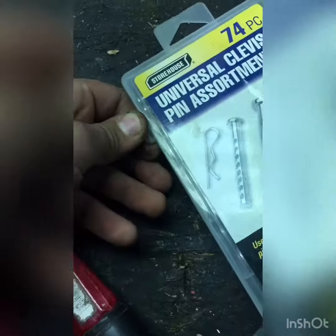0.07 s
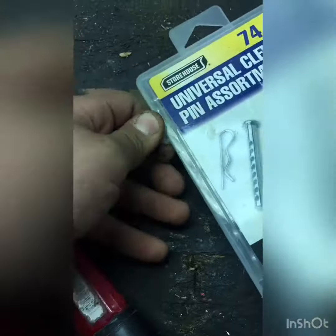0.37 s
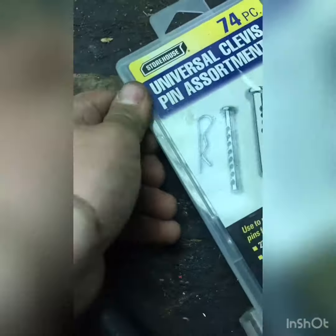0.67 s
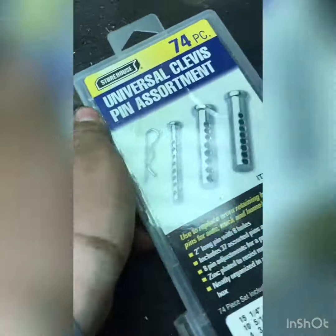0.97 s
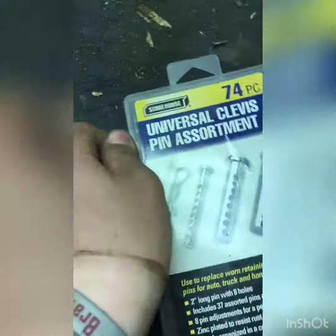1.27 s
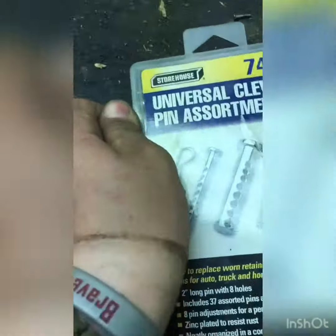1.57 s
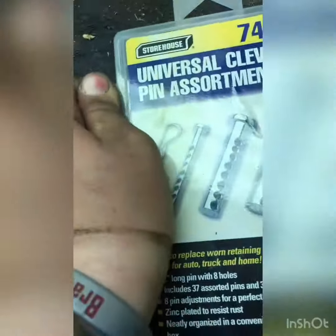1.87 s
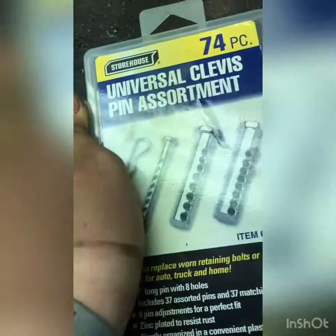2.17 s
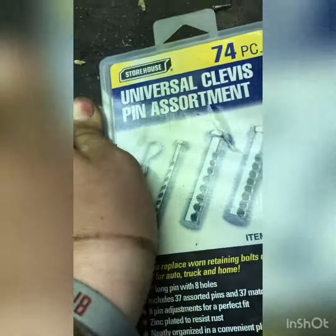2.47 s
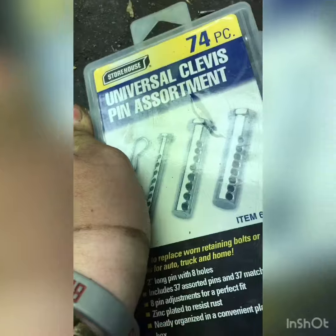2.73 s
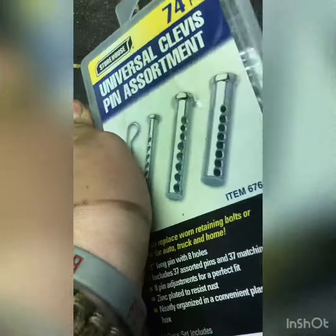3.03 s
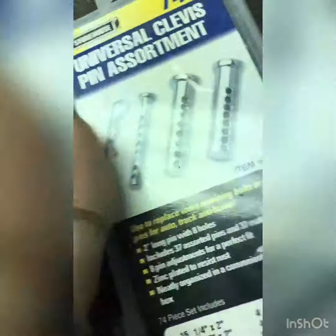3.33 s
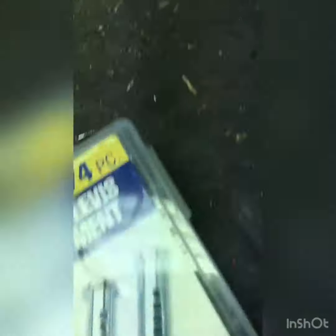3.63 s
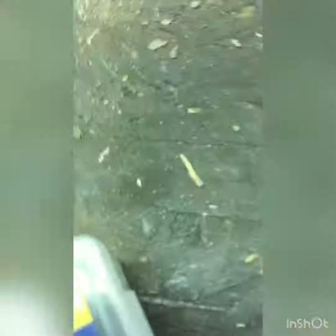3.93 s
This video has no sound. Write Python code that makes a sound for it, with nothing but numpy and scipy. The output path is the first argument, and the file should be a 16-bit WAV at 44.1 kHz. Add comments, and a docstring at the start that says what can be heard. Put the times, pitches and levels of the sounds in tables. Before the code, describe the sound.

Close handling of a plastic box, bumping and clattering with steel pins clinking inside.

```python
"""Handling a case of pins

A plastic case of small steel pins is gripped, dragged off a workbench and turned over, close by.
Knocks ring its lid and walls, soft bumps swing the whole case, and fingers rub its hollow shell.
The pins clink, slide and once crash together against a wall. A small workshop hums low behind it."""
import sys
import numpy as np
from scipy import signal
from scipy.fft import rfft, irfft
from scipy.io import wavfile
from scipy.ndimage import uniform_filter1d

SR = 44100
rng = np.random.default_rng(int(sys.argv[2]) if len(sys.argv) > 2 else 0)


def store_wav(level_fs):
    """Save 16-bit WAV to argv[1]."""
    pcm = np.round(np.clip(np.atleast_2d(level_fs), -1, 1) * 32767)
    wavfile.write(sys.argv[1], SR, pcm.T.astype(np.int16))


N = 176400
T = np.arange(int(.4 * SR)) / SR  # seconds within one short sound
SCENE_T = np.arange(N) / SR  # seconds within the whole scene
SLIDE_GRAINS_PER_S, SLIDE_SPREAD_DB = 700, 4

# The hiss of tiny contacts, of fingers or of pins. Each row: frequency in Hz, relative level in dB.
CONTACT_HISS = [(100, -69.5), (1500, -7.5), (3500, 6.5), (6500, 1.5), (8000, -1.5), (9500, -1), (10700, -7),
                (16000, -7.5)]


def amp(db):
    """Turn decibels into a factor to multiply by."""
    return 10 ** (np.asarray(db) / 20)


def unit(x):
    """Scale a sound to an average (rms) level of 1."""
    return x / np.sqrt(np.mean(x ** 2) + 1e-20)


def blow(x):
    """Scale a short sound to the energy of 10 ms at level 1."""
    return x / np.sqrt(np.sum(x ** 2) / (.01 * SR) + 1e-20)


def fade(t, t60):
    """Die away by 60 dB in t60 seconds, the fade time."""
    return amp(-60 * t / np.maximum(t60, 1e-3))


def read(points, hz):
    """Look up values between a table's rows, on a scale of octaves."""
    f, value = np.transpose(points)
    return np.interp(np.log(hz + 1), np.log(f + 1), value)


def add(mix, s, sound):
    """Lay a sound into the mix at s seconds."""
    part = mix[max(round(s * SR), 0):][:len(sound)]
    part += sound[:len(part)]


def through(x, response):
    """Let every sample of x set off the response, keeping the length of x."""
    return signal.fftconvolve(x, response)[:len(x)]


def colour(points, size=4096):
    """Make a click with the tone colour that a table gives."""
    log_gain = np.log(amp(read(points, abs(np.fft.fftfreq(size, 1 / SR)))))
    return np.fft.ifft(np.exp(np.conj(signal.hilbert(log_gain)))).real


def grains(count, per_s, spread_db):
    """Scatter tiny impacts of uneven size at random."""
    size = amp(spread_db * np.minimum(rng.exponential(1, count), 4))
    return unit(size * rng.choice([-1, 1], count) * (rng.random(count) < per_s / SR))


def resonance(x, hz, width_hz):
    """Let x ring one tone; a narrower width rings longer."""
    return unit(through(x, np.exp(-np.pi * width_hz * T) * np.sin(2 * np.pi * hz * T)))


def workshop(air_db=-59, hum_width_hz=7.4):
    """Faint air, and narrow bands of noise that make a low, wavering hum."""
    # The colour of the air. Each row: frequency in Hz, relative level in dB.
    air_colour = [(20, -69), (45, 13.5), (85, -15.5), (115, -19), (200, -9), (400, -14), (700, -21.5),
                  (1500, -35), (3000, -37), (6000, -44.5), (10000, -43.5), (16000, -41.5)]
    # The hum. Each row: pitch in Hz, level in dB.
    hum_tones = [(46, -61), (60, -58.5), (84, -57)]
    hz = np.fft.rfftfreq(N, 1 / SR)

    def noise(shape):
        return unit(irfft(rfft(rng.standard_normal(N)) * shape, N))

    air = amp(air_db) * noise(amp(read(air_colour, hz)))
    return air + sum(amp(db) * noise(1 / (1 + ((hz - f) / hum_width_hz) ** 2)) for f, db in hum_tones)


def patchy(x, patch_db=2.5):
    """The colour of the rubbing shifts as the contact points move."""
    spectra = signal.stft(x, SR, nperseg=1024, noverlap=768)[2]
    patches = uniform_filter1d(rng.standard_normal(spectra.shape), 9, 0)  # smooth across pitch
    patches = unit(uniform_filter1d(patches, 7, 1))  # and across time
    return unit(signal.istft(spectra * amp(patch_db * patches), SR, nperseg=1024, noverlap=768)[1][:N])


def rubbing(smooth_gain=1.17, clump_db=1.83):
    """Fingers and case stick and slip in uneven clumps, sounding the hollow shell and a fine hiss."""
    # The course of the rubbing. Each row: time in seconds, shell level in dB, hiss level in dB.
    strokes = [(0, -74, -79), (.235, -64.5, -74), (.3, -52.5, -57.5), (.4, -59.5, -67.5), (.63, -66, -73),
               (0.673, -65, -70.5), (0.698, -45.5, -54.5), (.75, -60.5, -71.5), (.81, -58.5, -65),
               (0.84, -46, -53.5), (.9, -53, -56.5), (1.05, -56, -58.5), (1.12, -47.5, -58),
               (1.19, -54, -60), (1.203, -41.5, -50), (1.35, -60.5, -70.5), (1.41, -61.5, -67),
               (1.51, -51, -63.5), (1.72, -59.5, -69), (2.09, -63, -70.5), (2.22, -68.5, -74.5),
               (2.34, -65, -72.5), (2.47, -53, -67), (2.546, -40.5, -54.5), (2.61, -52.5, -70),
               (2.73, -63.5, -72.5), (2.84, -48, -67), (2.91, -52.5, -67), (3.11, -33, -52),
               (3.178, -47, -66), (3.33, -46.5, -71), (3.42, -66, -71), (3.56, -59.5, -71),
               (3.65, -54, -62), (3.73, -63, -72), (3.77, -67.5, -69), (3.815, -57.5, -66.5),
               (3.89, -52, -58), (3.94, -56.5, -69)]
    # The colour of the hollow shell. Each row: frequency in Hz, relative level in dB.
    shell_colour = [(60, -8), (250, -2), (450, -3.5), (640, 4), (800, -2.5), (1100, -3), (1700, -3.5),
                    (2400, -12), (3500, -21.5), (6000, -28.5), (16000, -92)]
    s, shell_db, hiss_db = np.transpose(strokes)
    slips = grains(N, SLIDE_GRAINS_PER_S, SLIDE_SPREAD_DB) + smooth_gain * rng.standard_normal(N)
    slips *= amp(clump_db * unit(uniform_filter1d(rng.standard_normal(N), size=400)))
    shell = amp(np.interp(SCENE_T, s, shell_db)) * patchy(through(slips, colour(shell_colour)))
    hiss = amp(np.interp(SCENE_T, s, hiss_db)) * unit(through(slips, colour(CONTACT_HISS)))
    return shell + hiss


def ticks(decay_s=0.00047, size=600):
    """The shell gives tiny, dry snaps under the fingers."""
    # Each row: start in seconds, level in dB, centre pitch in Hz.
    snaps = [(.058, -68.5, 4630), (.202, -68, 4460), (0.238, -59, 4400), (0.488, -74, 5600),
             (.743, -58, 4400), (0.983, -54.5, 6640), (1.031, -55, 10700), (2.037, -59.5, 12100),
             (2.154, -53, 12500), (3.021, -51, 7400)]
    out, t = np.zeros(N), T[:size]
    for s, db, hz in snaps:
        snap = rng.standard_normal(size) * np.exp(-t / decay_s)
        shell = np.exp(-1.5 * hz * t) * np.cos(2 * np.pi * hz * t)
        add(out, s, amp(db) * blow(through(snap, shell)))
    return out


def tumbles(hits_per_s=5300, spread_db=4.5, clash_gain=0.59):
    """Many pins collide in a dense shower that rings the heap, then dies away."""
    # Each row: start, hold time and fade time in seconds, level in dB, treble tilt in dB per octave.
    showers = [(0.2563, 0.024, 0.057, -34.5, -6.5), (1.077, 0.057, 0.056, -44.5, -11.5),
               (3.074, 0.015, .13, -48.5, -13), (3.2167, 0.052, 0.13, -29, 3)]
    # The tones of the heap. Each row: pitch in Hz, relative level in dB, fade time in seconds.
    heap_tones = [(3910, -10, 0.0091), (5590, -11.5, 0.014), (6390, -1, 0.0038), (7220, -5.5, 0.0043),
                  (8670, -2, 0.0077), (9500, -8.5, 0.01), (11200, -7.5, .016), (12300, -20, 0.044),
                  (15150, -16, .06)]
    out = np.zeros(N)
    for s, hold_s, t60, db, tilt_db in showers:
        effort = fade(np.maximum(T - hold_s, 0), t60)
        heap = np.zeros(len(T))
        for hz, tone_db, tone_t60 in heap_tones:
            hits = effort * grains(len(T), hits_per_s / len(heap_tones), spread_db)
            gain = amp(tone_db + tilt_db * np.log2(hz / heap_tones[0][0]))
            heap += gain * resonance(hits, hz, width_hz=np.log(1000) / (np.pi * tone_t60))
        clash = through(effort * grains(len(T), hits_per_s, spread_db), colour(CONTACT_HISS))
        shower = unit(unit(heap) + clash_gain * unit(clash))
        add(out, s, amp(db) * shower * np.sqrt(np.mean(effort ** 2)))
    return out


def ring(tones, t, rise_s, detune=0.026):
    """The plastic rings, its tones shifted a little by the grip and the place of the blow."""
    out = np.zeros(len(t))
    for hz, db, t60 in tones:
        shifted_hz = hz * (1 + detune * rng.uniform(-0.75, 1))
        out += amp(db) * fade(t, t60) * np.sin(2 * np.pi * (shifted_hz * t + rng.random()))
    return (1 - np.exp(-t / rise_s)) * out


def knocks(chatter_gain=2.08, wall_top_hz=2530, size=5000):
    """One hit with a brief chatter makes the lid boom, the walls clack and the contact crack."""
    # Each row: start in seconds, lid, wall and crack levels in dB, chatter decay in seconds.
    hits = [(.261, -28.5, -30.5, -30, 0.0059), (.269, -27, -36, -35, 0.0075),
            (.273, -31, -24.5, -36, 0.0058), (.281, -27, -46, -31.5, 0.0012),
            (.301, -38, -42.5, -49, 0.0022), (.345, -71, -50, -59, 0.005), (.509, -35.5, -36, -47, 0.007),
            (.575, -63, -51.5, -59, 0.0018), (1.074, -49, -33, -51, 0.006), (1.082, -33, -30, -37, 0.021),
            (1.0955, -48, -23, -50, 0.00028), (1.114, -54, -38, -43, 0.0051),
            (1.134, -40.5, -47, -50, 0.0031), (1.2806, -73, -41, -47, 0.0058),
            (1.804, -51, -42.5, -50, 0.0028), (1.811, -47.5, -44, -52, 0.0054),
            (1.897, -50.5, -49, -68, 0.013), (2.149, -51.5, -55, -62, 0.0019),
            (2.483, -60, -47.5, -47.5, 0.0032), (2.517, -50, -35, -45.5, 0.0046),
            (2.57, -42, -49, -53, 0.0034), (2.7769, -31.5, -33.5, -48.5, 0.0029),
            (2.8313, -71, -52, -44.5, 0.0042), (2.871, -65, -42, -69, 0.0013),
            (2.986, -45.5, -39, -43.5, 0.015), (3.034, -41.5, -41, -44, 0.0039),
            (3.049, -26.5, -43, -45, 0.002), (3.0852, -21.5, -21, -31.5, 0.0066),
            (3.101, -24.5, -29.5, -45, 0.0018), (3.111, -33.5, -35.5, -62, 0.0059),
            (3.13, -53, -38, -50, 0.0045), (3.2195, -17, -13.5, -17, 0.0023),
            (3.224, -20.5, -21.5, -24, 0.012), (3.239, -23, -18, -26.5, 0.026),
            (3.2545, -18.5, -17.5, -31.5, 0.0075), (3.2605, -11.5, -18, -44, 0.0034),
            (3.286, -14.5, -21.5, -30.5, 0.0049), (3.3065, -17, -31, -33, 0.0021),
            (3.389, -75, -46.5, -54, 0.0034), (3.483, -50.5, -56, -49, 0.014),
            (3.742, -37, -61, -59, 0.0083), (3.7519, -29, -37.5, -44.5, 0.0044),
            (3.9065, -36.5, -42, -48, 0.0033)]
    # The tones of lid and stiff walls. Each row: pitch in Hz, relative level in dB, fade time in seconds.
    lid_tones = [(520.5, -12.5, 0.037), (586, -5.5, 0.02), (650, 1, 0.03), (682, -3, 0.023),
                 (850, -9.5, 0.017)]
    wall_tones = [(1054, 2.5, 0.014), (1122, -5.5, 0.024), (1286, 3.5, 0.012), (1423, -6, 0.017),
                  (1718, -8.5, 0.032), (1947, -2.5, 0.0054)]
    # The colour of the dry crack. Each row: frequency in Hz, relative level in dB.
    crack_colour = [(200, -10), (900, 2.5), (1700, 1.5), (2300, 0.5), (3400, -2), (4600, -13.5),
                    (6500, -13), (9500, -19.5), (11000, -22), (16000, -32)]
    out, t, crack = np.zeros(N), T[:size], colour(crack_colour)
    # The plastic gives where it is hit, which keeps higher ringing out.
    give = signal.butter(4, wall_top_hz, fs=SR, output="sos")
    for s, lid_db, wall_db, crack_db, chatter_s in hits:
        force = rng.standard_normal(size) * np.exp(-t / chatter_s)
        force *= chatter_gain / np.linalg.norm(force)
        force[0] += 1  # the hit itself
        walls = signal.sosfilt(give, ring(wall_tones, t, rise_s=0.0001))
        lid = ring(lid_tones, t, rise_s=0.00046)
        for db, response in (lid_db, lid), (wall_db, walls), (crack_db, crack):
            add(out, s, amp(db) * blow(through(force, response)))
    return out


def bumps(scuff_gain=0.79, rise_s=0.00045):
    """The whole case bumps on bench or hand and swings low and briefly, with a dull scuff."""
    # Each row: start in seconds, level in dB, pitch in Hz, fade time in seconds.
    thuds = [(0.263, -21.5, 191, 0.052), (0.267, -24.5, 79.4, 0.25), (.269, -25, 315, 0.042),
             (0.508, -35.5, 180, 0.035), (0.51, -39, 91, 0.13), (0.653, -54, 260, 0.16),
             (1.095, -40, 78, 0.26), (1.205, -36, 67, 0.37), (1.632, -40.5, 378, 0.039),
             (1.895, -40.5, 376, 0.036), (1.924, -40, 209, 0.024), (2.149, -40.5, 410, 0.046),
             (2.363, -50, 388, 0.17), (2.636, -44.5, 388, 0.041), (3.049, -27.5, 316, 0.017),
             (3.087, -31.5, 285, 0.063), (3.22, -9, 304, 0.056), (3.2236, -7.5, 186, 0.083),
             (3.226, -11.5, 85.9, 0.24), (3.234, -24.5, 56.3, 0.48), (3.497, -39, 87, 0.4),
             (3.753, -29, 330, 0.064), (3.908, -36.5, 286, 0.036)]
    out = np.zeros(N)
    for s, db, hz, t60 in thuds:
        swing = 1.37 * np.sin(2 * np.pi * hz * T)
        scuff = scuff_gain * resonance(rng.standard_normal(len(T)), hz, hz / 2)
        add(out, s, amp(db) * (1 - np.exp(-T / rise_s)) * fade(T, t60) * (swing + scuff))
    return out


def clinks(width_hz=160, jitter_gain=0.9):
    """A single pin rings while it jitters against its neighbours."""
    # Each row: start in seconds, level in dB, pitch in Hz, fade time in seconds.
    pins = [(.344, -54.5, 6440, 0.071), (.345, -57, 9440, 0.07), (1.096, -46.5, 9520, 0.14),
            (1.281, -54, 9600, .1), (3.022, -46.5, 9550, 0.07), (3.081, -37, 6420, 0.083),
            (3.082, -46.5, 9240, 0.096), (3.222, -26.5, 11700, 0.082), (3.239, -36, 8800, .06),
            (3.253, -40, 15120, 0.15), (3.253, -34, 12130, 0.12), (3.298, -40, 12160, 0.076)]
    out = np.zeros(N)
    for s, db, hz, t60 in pins:
        jitter = jitter_gain * resonance(rng.standard_normal(len(T)), hz, width_hz)
        add(out, s, amp(db) * fade(T, t60) * (np.sin(2 * np.pi * hz * T) + jitter))
    return out


def raps(decay_cycles=1, top_hz=3470, size=1000):
    """A hard corner strikes; the gripping hand stops the ringing within a swing or two."""
    # Each row: start in seconds, level in dB, pitch in Hz.
    strikes = [(.509, -42, 676), (1.0959, -25.5, 1300), (1.364, -54.5, 730), (2.061, -53, 450),
               (2.942, -46, 895), (3.7521, -24, 880), (3.9067, -34, 680)]
    out, t = np.zeros(N), T[:size]
    give = signal.butter(4, top_hz, fs=SR, output="sos")
    for s, db, hz in strikes:
        swing = np.exp(-hz * t / decay_cycles) * np.sin(2 * np.pi * hz * t)
        add(out, s, amp(db) * blow(signal.sosfilt(give, np.diff(swing, prepend=0))))
    return out


def dragging(lid_hz=645, width_hz=80):
    """Friction on the bench makes the lid hum at its main tone."""
    # The course of the drag. Each row: time in seconds, level in dB.
    levels = [(.68, -80), (.72, -58), (.75, -75), (.775, -52), (.805, -59), (0.829, -45), (.86, -66),
              (.89, -86)]
    s, db = np.transpose(levels)
    return np.interp(SCENE_T, s, amp(db), 0, 0) * resonance(rng.standard_normal(N), lid_hz, width_hz)


def jingling():
    """As the case tilts, loose pins slide and nudge each other, which keeps them ringing."""
    # The course of the slide. Each row: time in seconds, level in dB.
    levels = [(2.8, -78), (2.98, -68), (3.14, -56), (3.19, -75)]
    # The tones of the pins. Each row: pitch in Hz, relative level in dB, width in Hz.
    pin_tones = [(5410, -11, 70), (9450, -6.5, 140)]
    s, db = np.transpose(levels)
    nudges = grains(N, SLIDE_GRAINS_PER_S, SLIDE_SPREAD_DB)
    ringing = sum(amp(tone_db) * resonance(nudges, hz, width_hz) for hz, tone_db, width_hz in pin_tones)
    return np.interp(SCENE_T, s, amp(db), 0, 0) * ringing


def room(x, early_db=-17, early_decay_s=0.016, tail_db=-21):
    """Quick echoes come off the bench, and the room adds a short, weak tail."""
    # The room's tail. Each row: frequency in Hz, fade time in seconds.
    fade_times = [(100, 0.46), (600, 0.084), (2000, 0.097), (6000, 0.15), (15000, 0.026)]
    hz, t, spectra = signal.stft(rng.standard_normal(len(T)), SR, nperseg=256)
    spectra *= fade(t, read(fade_times, hz)[:, None])
    tail = signal.istft(spectra, SR, nperseg=256)[1][:len(T)] * (T > .008)
    early = grains(len(T), per_s=2000, spread_db=1.7) * np.exp(-T / early_decay_s) * (T > .003)
    echoes = amp(tail_db) * tail / np.linalg.norm(tail) + amp(early_db) * early / np.linalg.norm(early)
    return through(x, echoes)


def scene():
    """Mix the case, its echoes and the workshop in one channel; the bumps get no echo."""
    case = knocks() + raps() + clinks() + jingling() + ticks() + tumbles() + rubbing() + dragging()
    return (case + room(case) + bumps() + workshop())[None, :]


def record(dry, hardness=6, low_hz=25, top_hz=15780):
    """Round off the loudest peaks, then cut the deepest rumble and the highest treble."""
    rounded = dry / (1 + abs(dry) ** hardness) ** (1 / hardness)
    low_cut = signal.butter(2, low_hz, "highpass", fs=SR, output="sos")
    top_cut = signal.firwin(401, top_hz, window=("kaiser", 9), fs=SR)
    return signal.oaconvolve(signal.sosfilt(low_cut, rounded), top_cut[None], "same")


dry = scene()
out = record(dry)
store_wav(out)
```